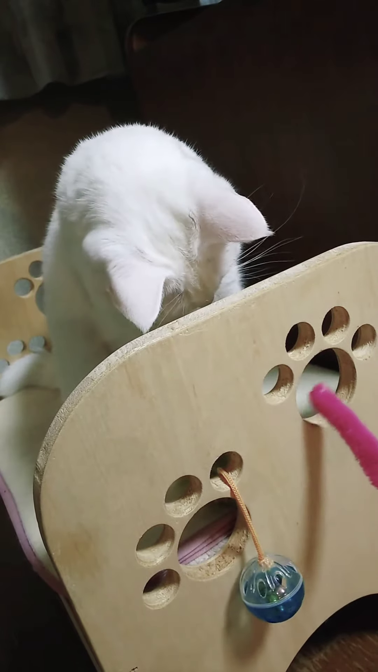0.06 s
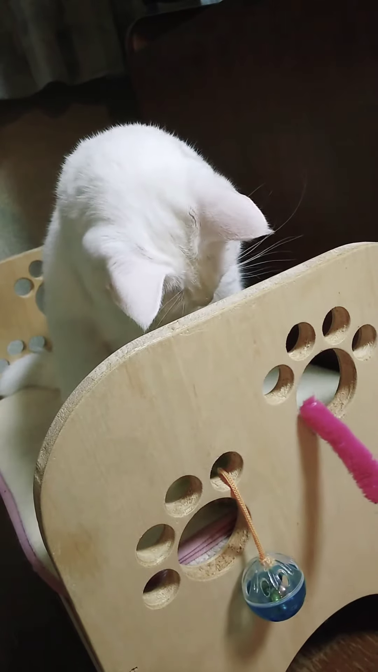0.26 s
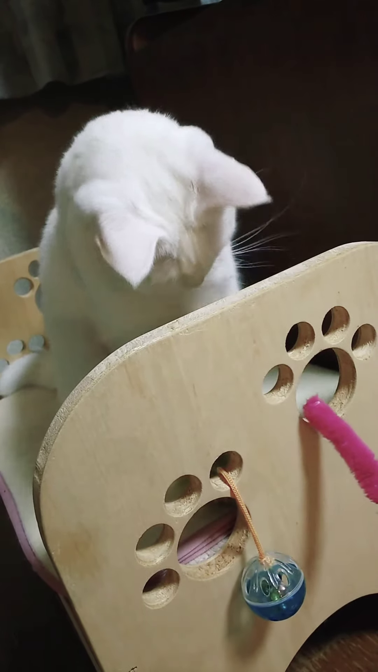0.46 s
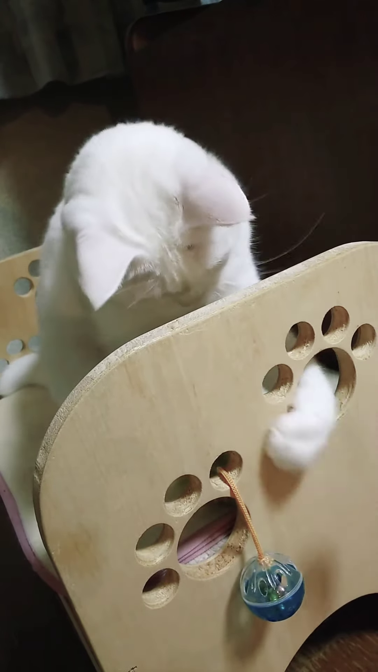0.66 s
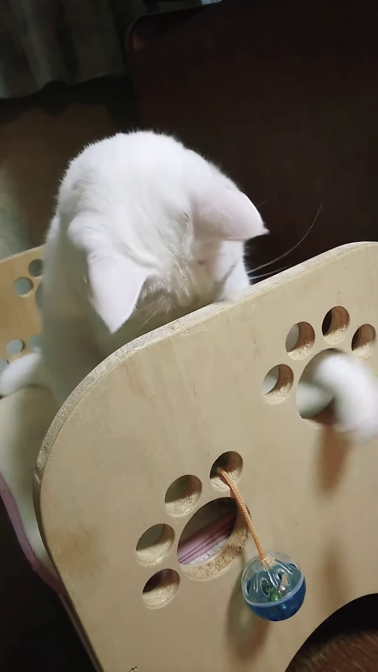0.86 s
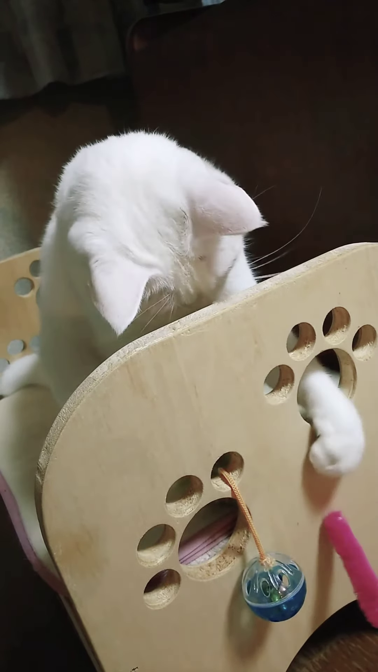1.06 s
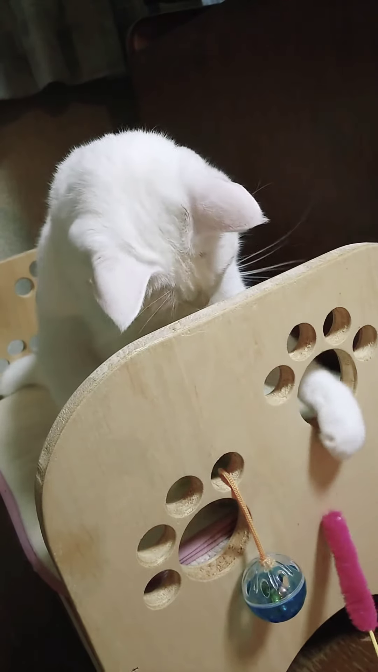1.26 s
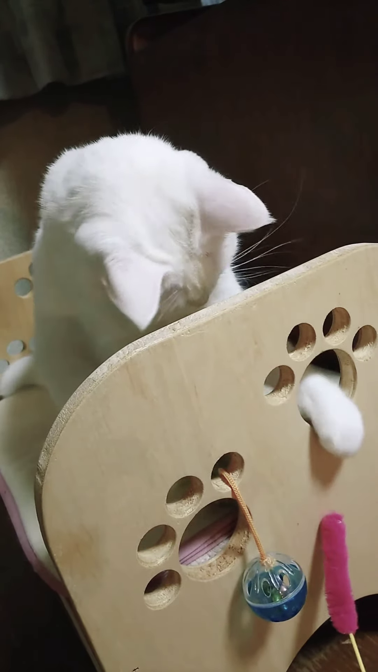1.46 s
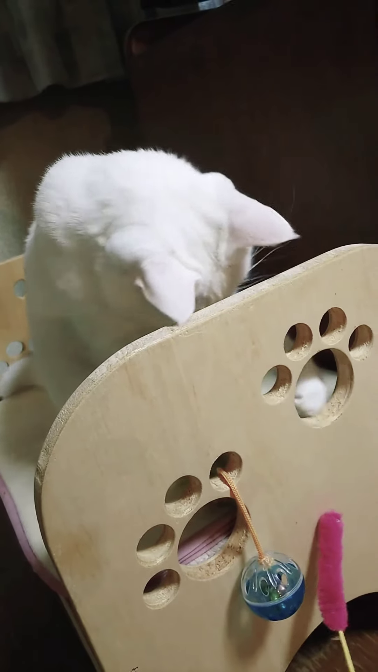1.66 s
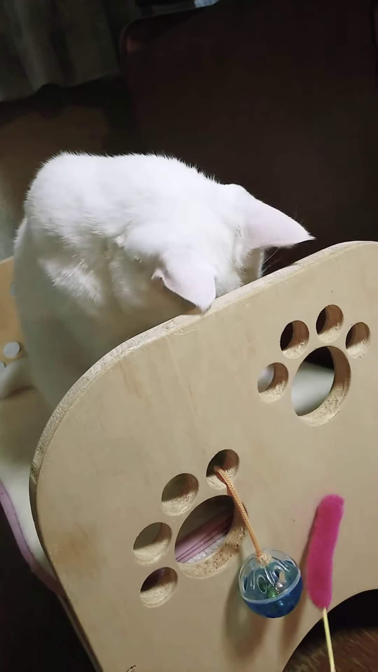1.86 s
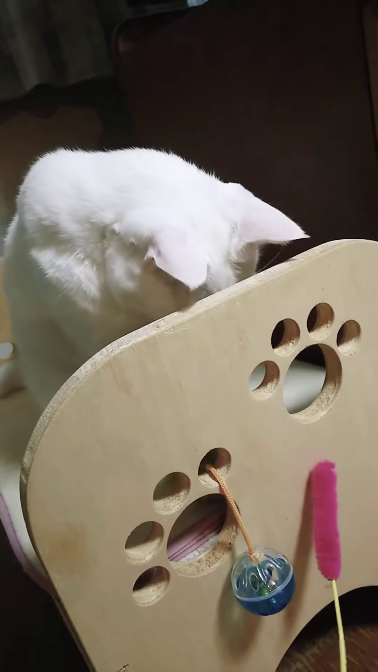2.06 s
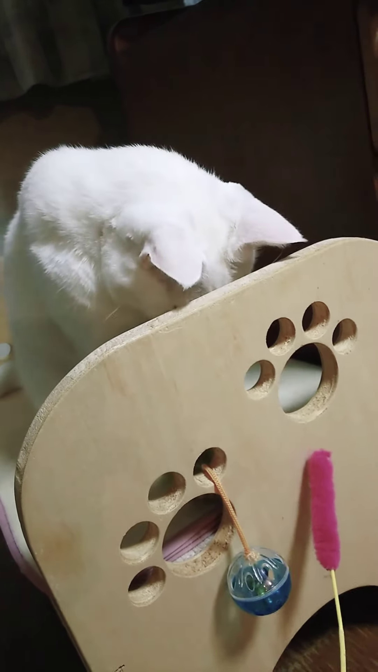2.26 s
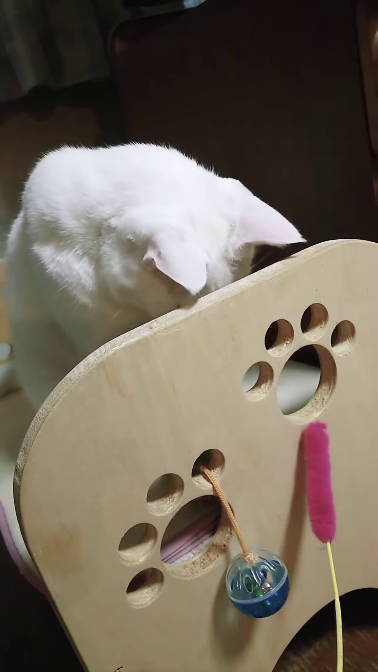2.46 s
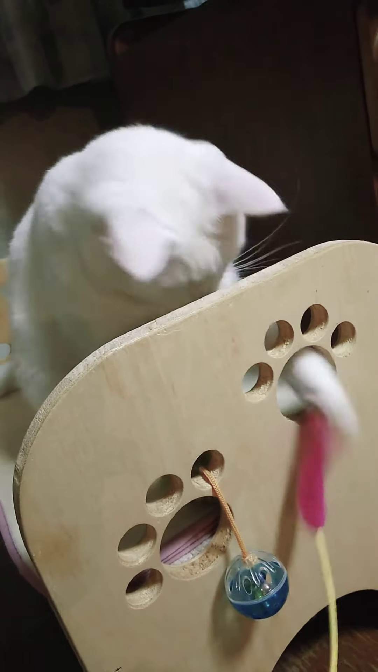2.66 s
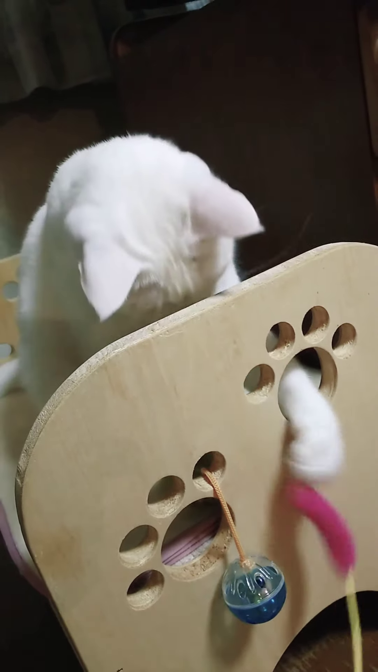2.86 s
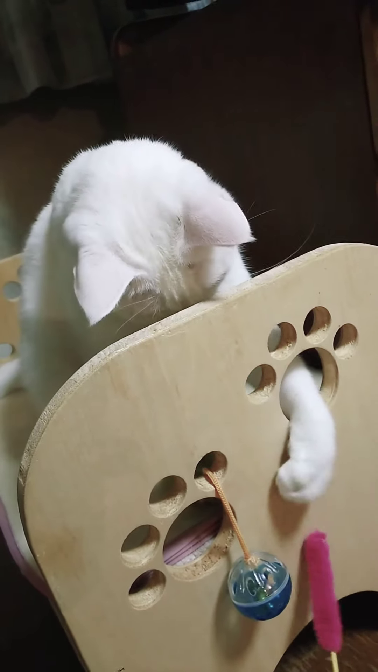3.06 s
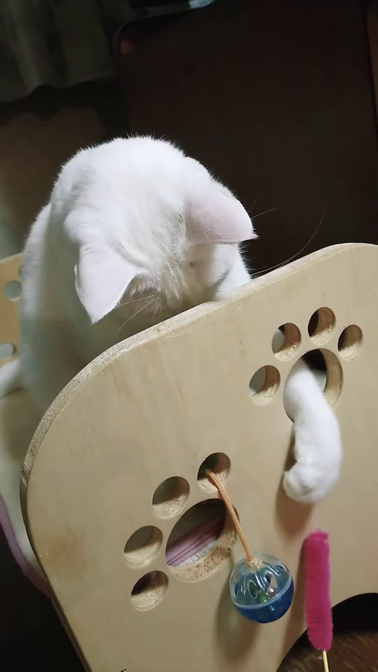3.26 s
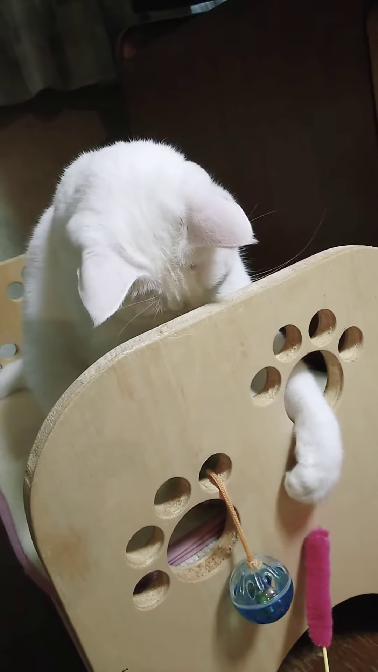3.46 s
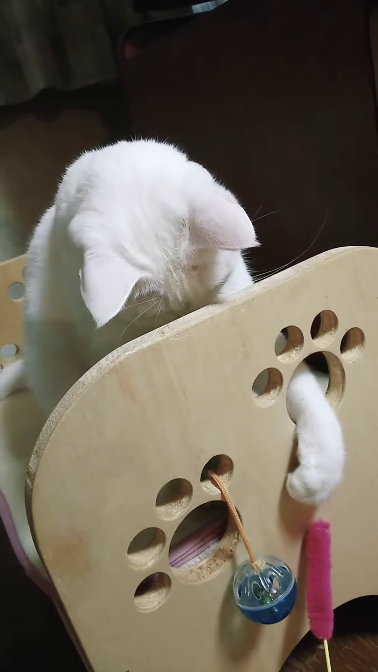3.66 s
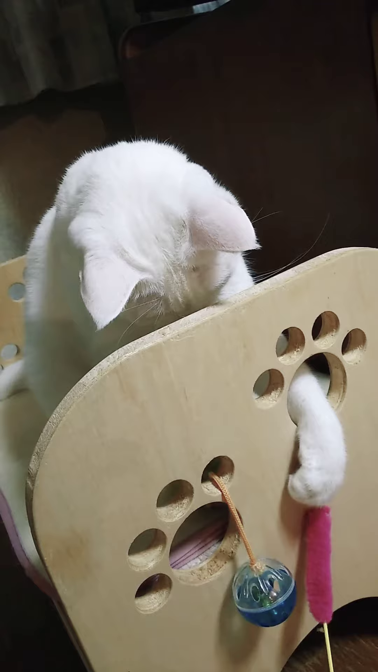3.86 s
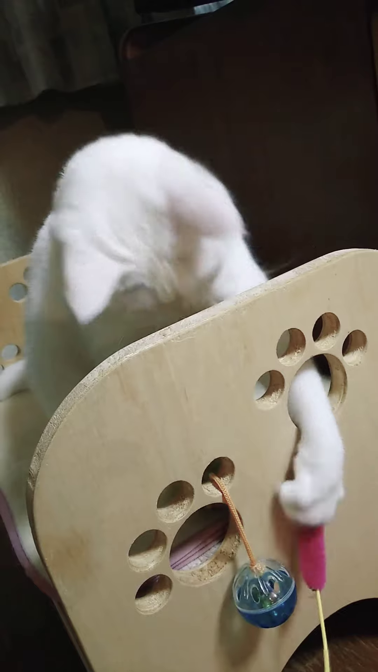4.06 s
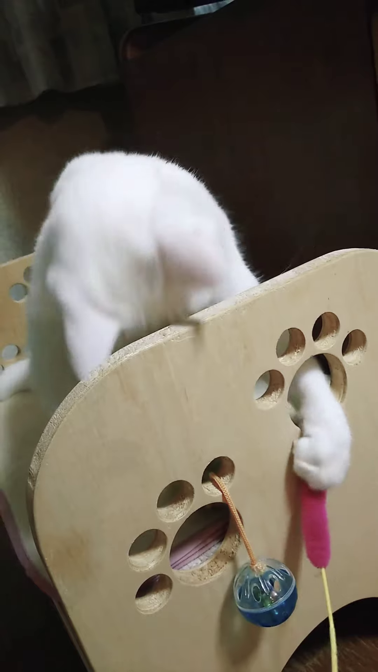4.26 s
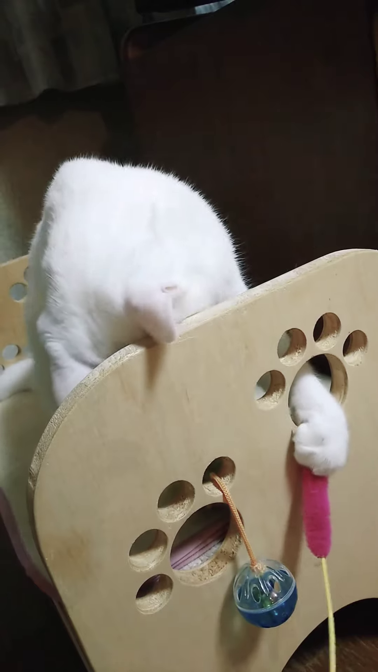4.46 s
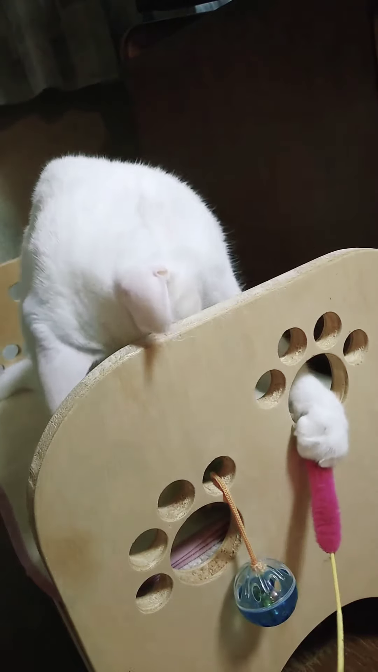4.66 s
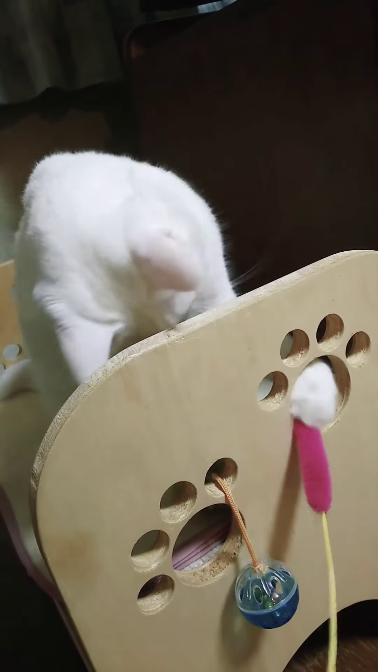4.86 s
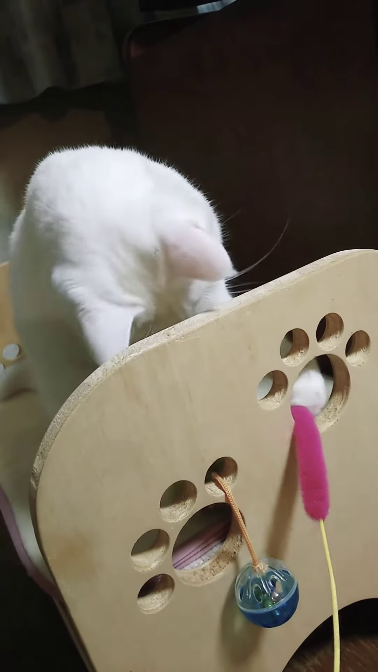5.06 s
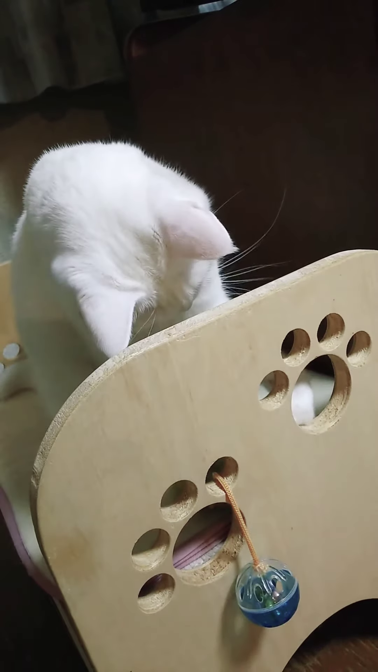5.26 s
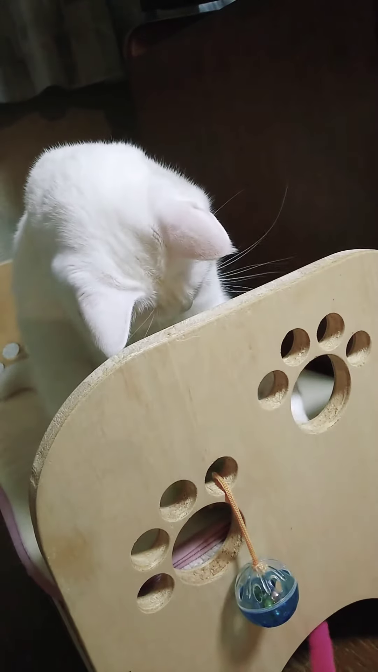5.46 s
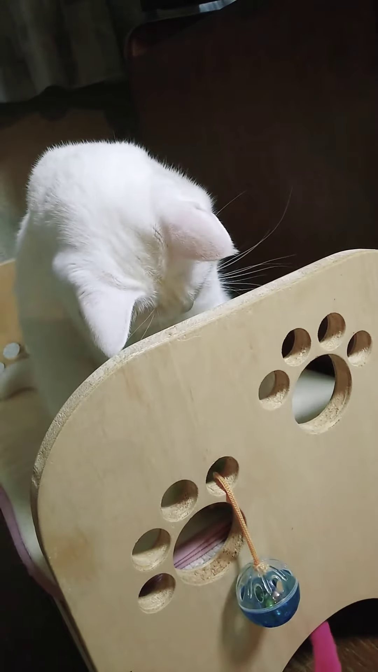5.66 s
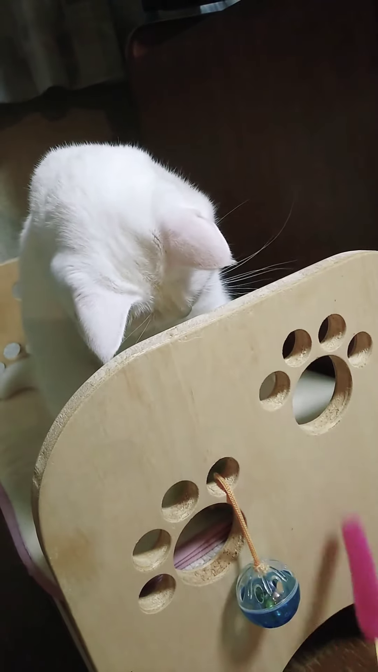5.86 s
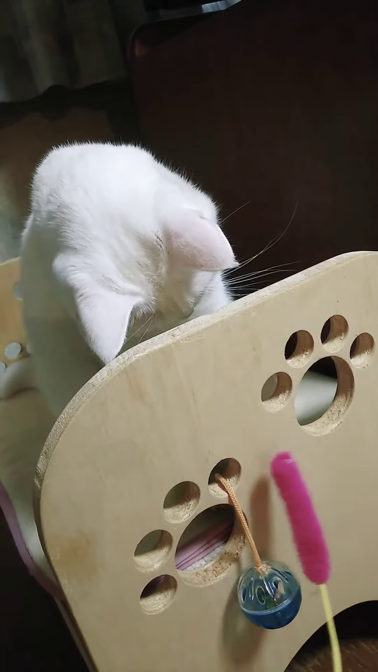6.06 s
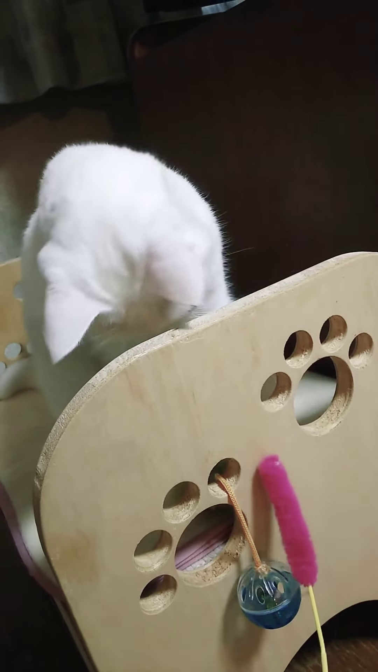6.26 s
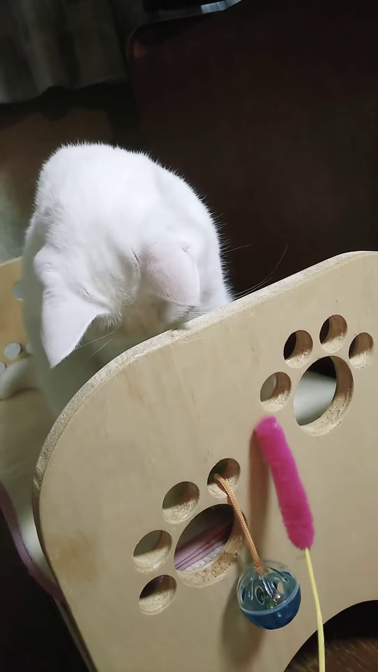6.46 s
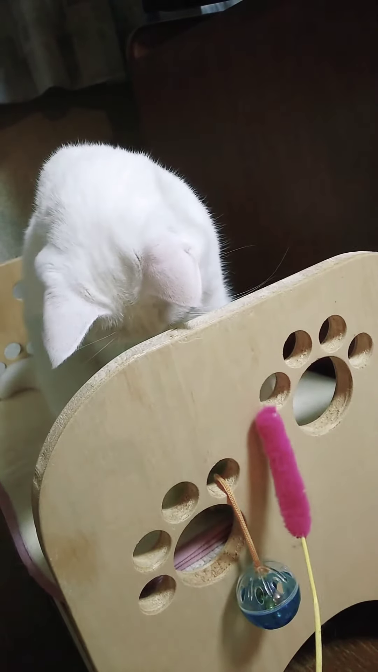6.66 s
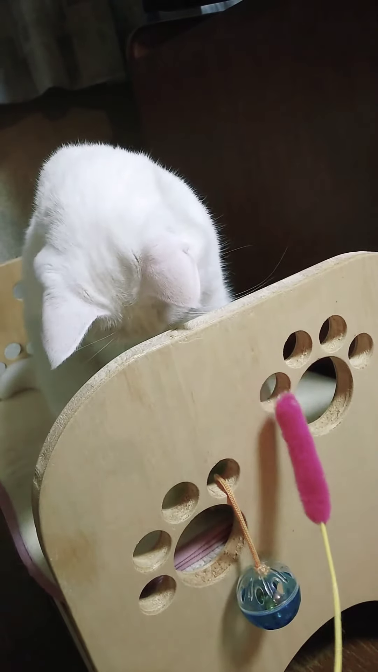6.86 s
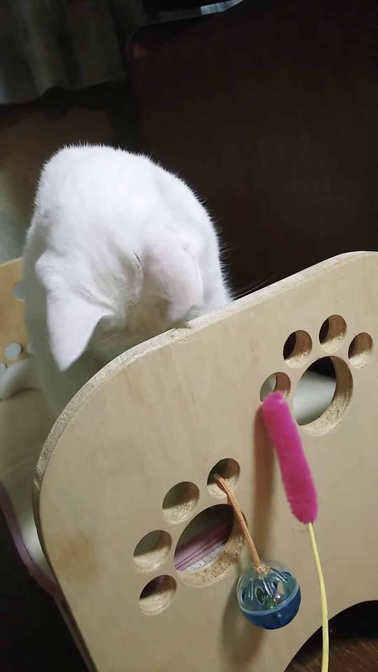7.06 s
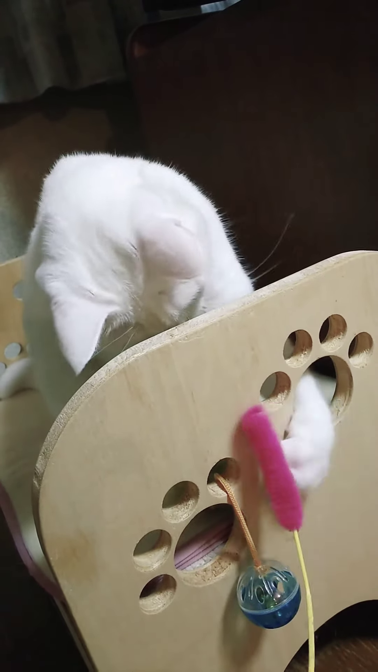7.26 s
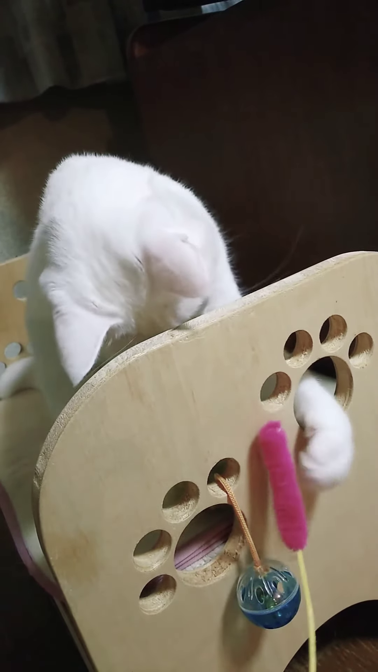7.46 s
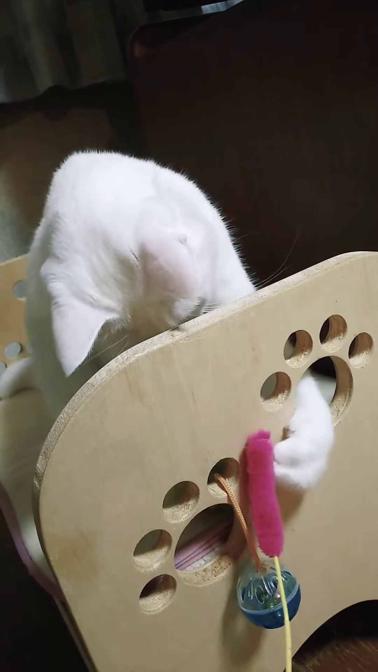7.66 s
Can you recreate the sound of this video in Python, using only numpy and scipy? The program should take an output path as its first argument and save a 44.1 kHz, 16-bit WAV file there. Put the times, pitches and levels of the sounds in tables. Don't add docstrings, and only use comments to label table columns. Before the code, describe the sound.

A cat's paw strikes thin plywood at irregular intervals, heard by a handheld phone nearby. Knocks are dry and brief, with bright claw clicks and a short hollow wooden ring; soft pads and the rocking bed add dull thuds. Fur and leg brush the wood around the pushes. Long quiet gaps show only steady hiss and low hum, with small indoor reflections after each hard blow.

```python
import sys
import numpy as np
from scipy import signal
from scipy.fft import rfft, irfft, next_fast_len
from scipy.io import wavfile
from scipy.ndimage import uniform_filter1d

SR = 44100
rng = np.random.default_rng(int(sys.argv[2]) if len(sys.argv) > 2 else 0)


def ratio_of_db(decibels):
    return 10 ** (np.asarray(decibels, float) / 20)


def waveform_to_disk(signal):
    frames = np.transpose(np.atleast_2d(signal))
    scaled = np.clip(frames, -1, 1) * 32767
    samples = np.round(scaled).astype(np.int16)
    wavfile.write(sys.argv[1], SR, samples)


N = 340893
LEFT_LAG = 16
TREBLE_PAN_DB = -2.5
PORT_SIDES = np.array([[.5], [-.5]])


def along(table, hz):
    f, v = np.transpose(table)
    return np.interp(np.log(np.maximum(hz, 1)), np.log(np.maximum(f, 1)), v)


def colour(x, table):
    size = x.shape[-1]
    hz = np.arange(size // 2 + 1) * SR / size
    return irfft(rfft(x) * ratio_of_db(along(table, hz)), size)


def band(x, lo_hz, hi_hz):
    return signal.sosfilt(signal.butter(2, [lo_hz, hi_hz], "band", fs=SR, output="sos"), x)


def rms(x):
    return np.sqrt(np.mean(x ** 2))


def walk(rate):
    hold = int(SR / rate)
    steps = np.repeat(rng.standard_normal(N // hold + 1), hold)
    return 1.337 * uniform_filter1d(uniform_filter1d(steps, hold), hold)[:N]


def add(out, s, sound, left_lag=LEFT_LAG):
    for port, lag in enumerate([left_lag, 0]):
        i = max(int(s * SR) + lag - left_lag // 2, 0)
        out[port, i:i + sound.shape[1]] += sound[port, :N - i]


def floor():
    # (frequency [Hz], level per Hz [dB])
    air_spectrum = [(12, -65), (20, -35), (53, 1), (70, -33), (92, 4.5), (124, -9), (151, -4.5),
                    (270, -10.5), (302, -6), (421, -10), (656, -10), (1050, -15.5), (8380, -23),
                    (13800, -29), (15000, -22)]
    # (frequency [Hz], correlation [-1..1])
    likeness = [(60, 0.061), (130, -0.11), (290, 0.52), (630, -0.073), (1390, -0.045), (3040, 0.13),
                (6670, -0.065), (14600, -0.036)]
    size = next_fast_len(N)
    like = np.clip(along(likeness, np.arange(size // 2 + 1) * SR / size), -1, 1)
    mid, side = rfft(rng.standard_normal((2, size))) * np.sqrt([1 + like, 1 - like])
    air = colour(irfft([mid + side, mid - side], size), air_spectrum)[:, :N]
    level_db = -55.5 + 0.18 * walk(2.34)
    return air * ratio_of_db(level_db) / rms(air.mean(0))


def hum():
    # (frequency [Hz], level [dB], width [Hz])
    lines = [(106.7, -64, 4), (199.7, -71, 2.89), (295.6, -63, 5.2), (653, -68.5, 28), (1259, -74, 24)]
    out = np.zeros((2, N))
    for hz, db, width in lines:
        turn = 2 * np.pi * np.cumsum(hz + 0.302 * width * walk(width)) / SR
        level = ratio_of_db(db + 0.5 + 2.32 * walk(width))
        out += level * np.sin(turn + np.array([[0], [.5]]))
    return out


def ring(modes, push, luck):
    spot_db, port_db, port_rad, detune = 1.5, 2.0, .6, .015
    t = np.arange(int(SR * np.max(modes, axis=0)[2])) / SR
    hz, db, t60 = (c[:, None] for c in np.repeat(modes, 3, axis=0).T)
    spot, shift, left, right, turn = (c[:len(hz), None] for c in luck)
    apart = np.minimum(hz / 3000, 1)
    phase = 2 * np.pi * hz * (1 + detune * apart * shift) * t
    out = []
    for weight, side in ((left, 1), (right, -1)):
        level = ratio_of_db(db + spot_db * spot + port_db * apart * weight - 60 * t / t60)
        out.append(np.sum(level * np.sin(phase + port_rad * apart * side * turn), 0))
    out = signal.fftconvolve(out, push[None])
    out = band(out, hz.min() / 1.3, hz.max() * 1.3)
    return out / np.abs(out).max()


def knocks():
    # (frequency [Hz], level [dB], t60 [s])
    body = [(480, -14, .04), (565, -7, .05), (655, 0, .06), (745, -4, .045)]
    face = [(2060, 0, .03), (2350, -3, .025), (2550, -2, .025), (2980, -2, .025), (3250, -3, .02),
            (3550, -4, .02)]
    edge = [(4070, 1, .02), (4690, -3, .014), (5100, -2, .015), (5430, -2, .015), (6000, -2, .014),
            (6700, 0, .014), (7400, -1, .012), (7800, -2, .012), (8700, 0, .012)]
    rim = [(1290, -3, .04), (1480, -12, .03), (1760, 0, .04), (1850, -3, .03)]
    # (frequency [Hz], level per Hz [dB])
    crack_spectrum = [(120, -41), (200, -59), (647, 8), (998, -8), (1310, 9.5), (1510, -3.5), (1780, 3.5),
                      (3470, 3), (4810, 3), (7150, 5), (8570, 4.5), (13700, -15.5), (15000, -60)]
    # (time [s], peak [dB], panel body re peak [dB],
    # claw treble re peak [dB], chatter [ms])
    face_knocks = [(0.0343, -58, -8, 14.5, 2.5), (0.69, -30.5, -3.5, -18, 7.5), (0.7015, -38, -4, -9, 9.7),
                   (1.0576, -52, -8, -13, 5), (2.7627, -19, -10, -16, 6.8), (2.7716, -13, -12, 8.5, 6.1),
                   (2.7772, -22.5, -3, -16, 7.4), (4.1396, -32, -11, -17, 3.3),
                   (4.3217, -29, -14, -2.5, 8.1), (4.8903, -38, -4, -8, 12), (4.924, -51, -15, 4, 5),
                   (5.194, -46, -5, -1.5, 7.4), (7.215, -20, -21.5, 3.5, 14), (7.289, -22, -20, 9.5, 4.5),
                   (7.2956, -14.5, -14, 9, 5.5), (7.319, -27, -25, -3, 6.7), (7.6073, -30, -9, -11, 7.8)]
    # (time [s], peak [dB], panel body re peak [dB],
    # claw treble re peak [dB], chatter [ms])
    rim_knocks = [
        (1.1064, -51, -7, -25, 3.3),
        (4.1142, -11.5, -6, -1.5, 4.43),
        (4.1185, -13.5, -7.5, 1.5, 5.2),
    ]
    rim_on_face_db, rim_on_rim_db = -11, 2.5
    blows = [(*k, rim_on_face_db) for k in face_knocks] + [(*k, rim_on_rim_db) for k in rim_knocks]

    tones, cracks = np.zeros((2, N)), np.zeros((2, N))
    t = np.arange(1024) / SR
    facing = ratio_of_db(TREBLE_PAN_DB * PORT_SIDES)
    for s, db, body_db, claw_db, ms, rim_db in sorted(blows):
        luck = rng.standard_normal((4, 5, 27))
        tips, hiss = rng.random((2, 1024)), rng.standard_normal((2, 1024))
        shape = (1 - np.exp(-(t / 0.00159) ** 2)) * np.exp(-(t * 1000 / max(ms, .5)) ** 2)
        push = shape * (tips[0] < .08) * ratio_of_db(14.0 * tips[1]) * np.sign(hiss[0])
        blow = push * (np.abs(push) > .7 * np.abs(push).max())
        parts = [(face, blow, ratio_of_db(-0.5)), (body, blow, ratio_of_db(body_db)), (rim, blow, ratio_of_db(rim_db)),
                 (edge, push, ratio_of_db(claw_db) * facing)]
        for (modes, force, gain), chance in zip(parts, luck):
            add(tones, s - .001, ratio_of_db(db + 3.0) * gain * ring(modes, force, chance))
        scrape = shape * (hiss[:1] + 5.1 * hiss)
        crack = colour(np.pad(scrape, ((0, 0), (0, 1024))), crack_spectrum)[:, :1024]
        crack_level = ratio_of_db(db + 7.0 + .45 * claw_db) * facing
        add(cracks, s - .001, crack_level * crack / np.abs(crack).max())
    return tones, cracks


def room(dry):
    # (frequency [Hz], t60 [s])
    room_t60 = [(150, 0.43), (600, 0.21), (2000, 0.27), (5000, 0.22), (10000, 0.21)]
    level_db, delay_s = -8, 0.0034
    t = np.arange(SR // 2) / SR
    tail = np.zeros((2, len(t)))
    for hz in 80 * 2. ** np.arange(8):
        echoes = band(rng.standard_normal((2, len(t))), hz / 1.24, hz * 1.59)
        tail += echoes * ratio_of_db(-60 * t / along(room_t60, hz))
    tail *= np.clip(t / delay_s - 1, 0, 1)
    tail /= np.sqrt(np.sum(tail ** 2) / 2)
    return ratio_of_db(level_db) * signal.fftconvolve(dry, tail, axes=1)[:, :N]


def pressure():
    # (time of most pressure [s], brush [dB], rise [s], fall [s],
    # treble re brush [dB])
    strokes = [(0.6, -51, 0.073, 0.11, -16), (0.66, -48, 0.096, 0.13, -3.5), (0.7, -44, 0.027, 0.06, -13),
               (1.05, -54.5, .07, 0.045, -11), (1.11, -53, 0.062, 0.028, -15), (1.3, -61, .06, 0.068, 3.5),
               (1.564, -63, .08, 0.026, -17), (3.07, -56, 0.88, 0.046, -6), (3.376, -59, 0.043, 0.089, -1),
               (3.52, -61, 0.089, .3, 2.5), (4.2, -57, .08, 0.24, -16), (4.31, -43.5, 0.23, .04, -4.5),
               (4.36, -55, .04, 0.37, -5), (4.73, -57.5, 0.075, 0.31, -1.5), (4.884, -51, 0.059, 0.027, -2),
               (4.92, -52.5, 0.064, 0.16, 1.5), (5.198, -52, 0.14, 0.045, -1), (5.23, -55, .04, 0.18, 0.5),
               (5.82, -60, 0.11, .04, -1.5), (6.0, -62, .3, 0.44, -1.5), (7.206, -47, 0.054, .03, -8),
               (7.41, -65, .04, 0.087, -10), (7.598, -53.5, .15, .03, -9), (7.625, -48, 0.022, .05, -15)]
    # (time [s], brush [dB], rise [s], fall [s])
    shoves = [
        (0.645, -53, 0.16, 0.25),
        (1.078, -56.5, .05, .06),
        (2.815, -41.5, 0.048, 0.084),
        (7.33, -48.5, 0.078, 0.075),
    ]
    # (time [s], brush [dB])
    grazes = [
        (0.692, -38),
        (4.112, -26.5),
        (4.321, -34.5),
        (4.89, -43.5),
        (7.213, -36),
        (7.607, -46),
    ]
    swell_db = 22
    drag_db = -5.5
    rows = [(*k, drag_db) for k in strokes]
    rows += [(*k, -2, 5.5) for k in shoves]  # treble, drag re brush [dB]
    rows += [(*g, 0.003, 0.0032, -12.5, drag_db) for g in grazes]

    power = np.zeros((3, N))
    for s, db, rise, fall, treble_db, part_drag_db in rows:
        i = np.arange(max(int((s - 2 * rise) * SR), 0), min(int((s + 2 * fall) * SR), N))
        away = np.maximum((s - i / SR) / rise, (i / SR - s) / fall)
        parts_db = np.array([[0], [treble_db], [part_drag_db]])
        power[:, i] += ratio_of_db(2 * (db - swell_db * away + parts_db))
    return np.sqrt(power)


def fur():
    unevenness_db = 1.7 * rng.exponential(size=N) + 1.6 * walk(60)
    grains = rng.standard_normal((3, N)) * ratio_of_db(unevenness_db)
    hairs = grains[:1] + 3.7 * grains[1:]
    hairs[0] = grains[0, np.arange(N) - LEFT_LAG] + 2.6 * grains[1]
    brush, treble, drag = band(hairs, 1000, 5500), band(hairs, 4500, 9500), band(hairs, 150, 800)
    layers = zip(pressure(), (brush, treble, drag))
    return sum(gain * x / rms(x) for gain, x in layers) * ratio_of_db(1.0)


def lone_modes(rows):
    panel_lag = 11
    out, t = np.zeros((2, N)), np.arange(16384) / SR
    for s, db, hz, t60 in rows:
        onset = 1 - np.exp(-(t * hz / 0.69) ** 2)
        wave = onset * ratio_of_db(db + 2.5 - 60 * t / t60) * np.sin(2 * np.pi * hz * t)
        pan = ratio_of_db(TREBLE_PAN_DB * min(hz / 4000, 1) * PORT_SIDES)
        add(out, s, wave * pan, panel_lag * (hz < 1000))
    return out


def thumps():
    # (time [s], peak [dB], frequency [Hz])
    bed_thumps = [(0.63, -52, 191), (0.68, -54, 196), (0.955, -39, 107.5), (1.021, -48, 82),
                  (2.77, -40, 105), (2.772, -44, 55), (2.779, -41, 185), (2.8, -36, 110), (2.845, -42, 108),
                  (2.89, -46, 111), (4.115, -39, 249), (4.131, -44, 102), (4.199, -43, 102),
                  (4.33, -47, 130), (7.222, -42, 108), (7.29, -45, 60), (7.293, -34, 146),
                  (7.32, -41.5, 215), (7.334, -36, 111), (7.372, -41, 110), (7.409, -52, 111),
                  (7.612, -49, 120)]
    # (time [s], peak [dB], frequency [Hz])
    pads = [(0.631, -46, 262), (0.659, -39, 254), (0.719, -43, 244), (2.774, -19.5, 664), (2.783, -32, 672),
            (2.811, -33.5, 562), (2.837, -30, 660.5), (2.855, -37.5, 667), (4.139, -41, 582),
            (4.235, -40.5, 730), (4.321, -41, 643), (7.184, -45, 676), (7.215, -33, 750),
            (7.229, -40.5, 657), (7.292, -26.5, 759), (7.298, -29.5, 663), (7.608, -44, 661),
            (7.664, -52, 662), (7.562, -50, 653)]
    # (time [s], peak [dB], frequency [Hz])
    more_pads = [
        (2.775, -31, 338),
        (2.795, -31, 355),
        (2.832, -34, 361),
        (2.859, -40, 366),
        (4.117, -34.5, 346),
        (4.118, -26, 504),
        (7.211, -41.5, 376),
        (7.247, -39.5, 383),
        (7.293, -32, 370),
        (7.335, -41, 375),
    ]
    t60_s, damping = .16, 0.32
    rows = [(*k, t60_s * (100 / k[-1]) ** damping) for k in bed_thumps + pads + more_pads]
    return lone_modes(rows)


def plucks():
    # (time [s], peak [dB], frequency [Hz])
    claw_plucks = [(0.691, -41.5, 4100), (0.703, -40, 2100), (1.058, -55, 2600), (1.108, -50, 2600),
                   (1.43, -57, 2600), (1.56, -54, 4000), (4.115, -19, 1290), (4.115, -17, 1750),
                   (4.115, -18.5, 2980), (4.116, -16, 2090), (4.115, -20, 4070), (4.144, -39, 1885),
                   (4.322, -43, 2470), (4.322, -33.5, 4070), (4.891, -48, 2420), (7.216, -33, 2120),
                   (7.216, -21.5, 2560), (7.216, -21, 4080), (7.289, -24, 4220), (7.293, -23.5, 1897),
                   (7.296, -23, 4700), (7.608, -35, 2050), (7.608, -40, 4080)]
    return lone_modes([(*k, 0.03) for k in claw_plucks])


def scene():
    tones, cracks = knocks()
    tones += thumps() + plucks()
    noises = cracks + fur()
    ring_send_db = -4.5
    echoes = room(ratio_of_db(ring_send_db) * tones + noises)
    return tones + noises + echoes + floor() + hum()


def top_cut(x):
    return signal.sosfilt(signal.butter(12, 15220, fs=SR, output="sos"), x)


def record(dry):
    # (frequency [Hz], gain [dB])
    mic = [(30, -4.5), (90, 0.5), (9100, 2.5), (9600, -2.5), (10000, -16), (10450, -3.5), (13500, -3),
           (14600, -11), (15100, -44)]
    rounded = np.tanh(dry / .78) * .78
    heard = colour(np.pad(rounded, ((0, 0), (0, next_fast_len(N) - N))), mic)[:, :N]
    return top_cut(heard)


dry = scene()
out = record(dry)
waveform_to_disk(out)
```